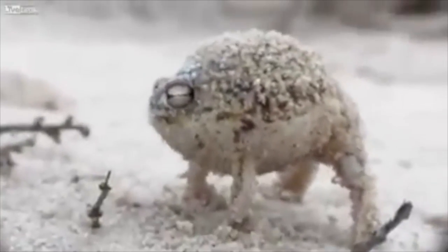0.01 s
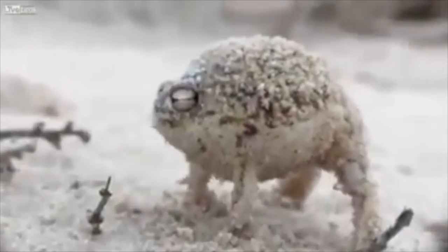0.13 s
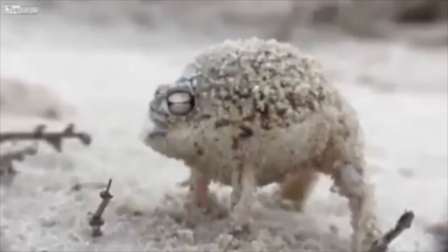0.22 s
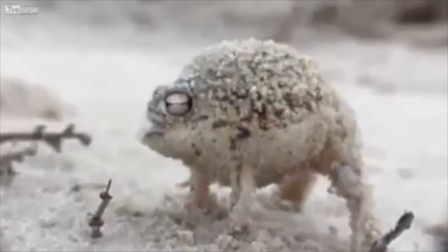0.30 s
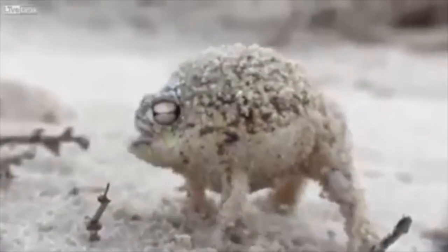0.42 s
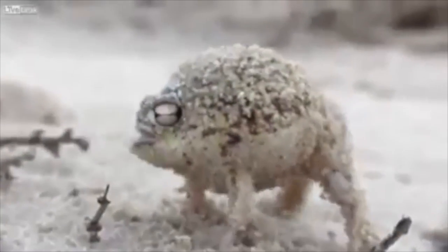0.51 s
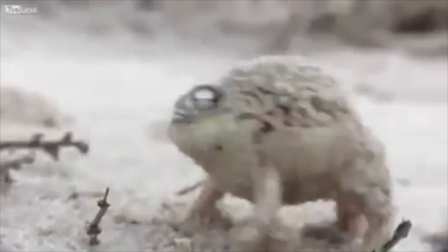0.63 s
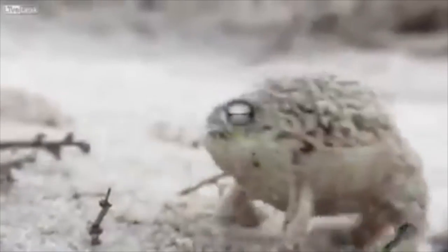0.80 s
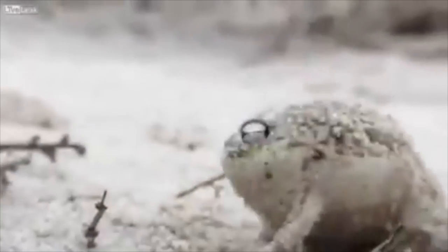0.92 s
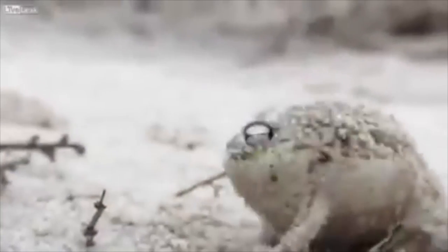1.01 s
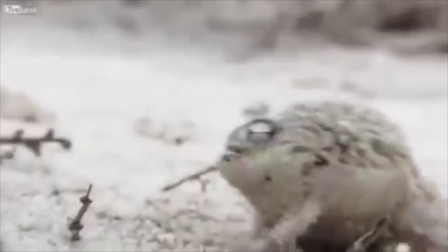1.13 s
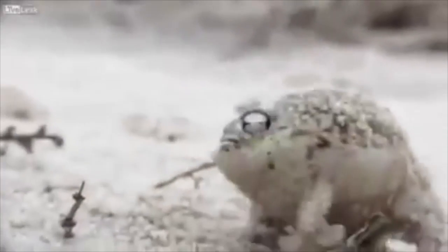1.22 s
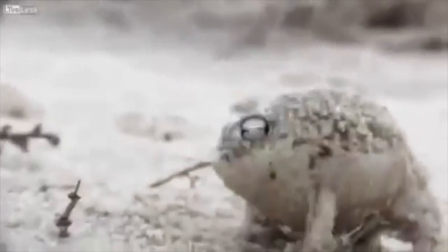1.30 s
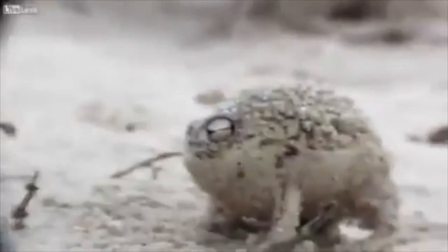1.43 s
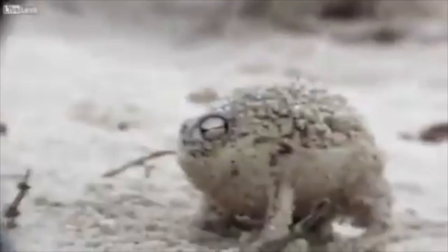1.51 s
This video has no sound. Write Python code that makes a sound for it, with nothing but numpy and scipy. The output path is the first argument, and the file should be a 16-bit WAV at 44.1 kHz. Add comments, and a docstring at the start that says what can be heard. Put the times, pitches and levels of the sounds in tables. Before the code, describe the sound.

Close, mono outdoor sound of a tiny frog crying shrilly twice, first long, then short with a husky end, after a faint low bump; light gusts rumble beneath and the open ground returns little echo.

```python
"""Open sand in light wind, a small desert rain frog close to the microphone, a faint hiss throughout.
First a dull thud with a soft knock in it, then a long shrill squeak, a short gap and a shorter squeak.
Each cry is a stack of harmonics gliding in pitch; a sharp resonance lifts one after another, then sinks
as the cry runs out into a rasp. Husky puffs of shaped noise mark where the voice breaks, sand and scrub
return a weak echo, and the wind is low noise rising and falling in gusts."""
import sys
import numpy as np
from scipy import signal
from scipy.fft import rfft, irfft
from scipy.io import wavfile

SR = 44100
rng = np.random.default_rng(int(sys.argv[2]) if len(sys.argv) > 2 else 0)


def wav_out(sig):
    """Save sig, one row per channel (or a flat mono array), as 16-bit PCM at SR to the path in sys.argv[1]."""
    wavfile.write(sys.argv[1], SR, np.round(np.clip(np.atleast_2d(sig).T, -1, 1) * 32767).astype(np.int16))


N = 68355
TIME = np.arange(N) / SR   # seconds

# Gusts on the microphone. Each row: time in seconds, level in dB.
WIND_GUSTS = [(0, -39.5), (.07, -34), (.12, -54), (.22, -43.5), (.3, -62), (.43, -43.5), (.52, -47),
              (.6, -45.5), (.68, -36), (.73, -48), (.78, -39), (.85, -49), (.96, -60), (1.07, -59),
              (1.14, -47.5), (1.22, -60.5), (1.55, -54.5)]
# Spectrum of the wind rumble. Each row: frequency in Hz, relative density in dB per Hz.
WIND_SPECTRUM = [(15, -8.5), (30, -0.5), (55, 3), (90, 1), (150, -5), (250, -21.5), (500, -42.5),
                 (1500, -73.5)]
# Spectrum of the faint outdoor hiss. Each row: frequency in Hz, relative density in dB per Hz.
AIR_SPECTRUM = [(30, -10), (130, -1.5), (270, -1), (450, -8), (800, -11.5), (1500, -20.5), (3000, -27.5),
                (6000, -30.5), (8200, -35.5), (9000, -48.5)]
# Spectrum of the dull thud. Each row: frequency in Hz, relative density in dB per Hz.
THUD_SPECTRUM = [(40, -3), (110, 3.5), (210, -2.5), (350, -13.5), (700, -22.5), (1100, -45), (3000, -62)]
# Places where the voice breaks into a husky rattle.
# Each row: time of the peak in seconds, level there in dB, rise and fall constants in seconds.
VOICE_BREAKS = [(0.212, -40, 0.0032, 0.0055), (0.798, -44, .008, 0.014), (1.057, -44, 0.0053, 0.0063),
                (1.25, -48, 0.017, .04), (1.318, -40, .016, 0.014)]
# Spectrum of the husky air. Each row: frequency in Hz, relative density in dB per Hz.
HUSK_SPECTRUM = [(600, -29.5), (1200, -5.5), (1800, 2), (2600, 1), (3500, -5), (4400, -17), (5800, -13.5),
                 (8000, -33)]
# Fixed colour of throat and body. Each row: frequency in Hz, level of a harmonic there in dB.
THROAT_COLOUR = [(550.0, -59.2), (1000.0, -51.3), (1400.0, -43.5), (2000.0, -39.0), (2400.0, -38.8),
                 (2750.0, -43.2), (3250.0, -37.2), (3750.0, -39.1), (4400.0, -50.3), (4700.0, -40.9),
                 (5050.0, -31.2), (5600.0, -28.6), (6200.0, -28.3), (6700.0, -36.4), (7300.0, -28.0),
                 (8000.0, -29.6), (8450.0, -34.0), (8900.0, -56.2)]
# Pitch of each cry. Each row: time in seconds, fundamental in Hz.
LONG_PITCH = [(0.207, 1520), (0.214, 1400), (0.218, 1174), (0.222, 1061), (0.231, 1044), (0.243, 1092),
              (0.26, 1178), (0.28, 1218), (0.3, 1239), (0.328, 1256), (0.355, 1233), (0.4, 1161),
              (0.47, 1060), (0.542, 924), (0.575, 918), (0.6, 902), (0.635, 866), (0.666, 814), (0.69, 817),
              (0.72, 817), (0.738, 784), (0.766, 680), (0.79, 646), (0.83, 640)]
SHORT_PITCH = [(1.037, 1270), (1.043, 1335), (1.05, 1270), (1.057, 930), (1.062, 904), (1.07, 906),
               (1.085, 955), (1.1, 991), (1.125, 1026), (1.15, 1040), (1.175, 1031), (1.2, 989),
               (1.222, 920), (1.242, 836), (1.26, 729), (1.272, 666), (1.284, 617), (1.296, 619),
               (1.301, 550), (1.307, 530), (1.313, 420), (1.324, 320), (1.36, 240)]
# Effort of each cry. Each row: time in seconds, level in dB, roughness from 0 to 1.
LONG_EFFORT = [(0.202, -23, 0.46), (0.21, 3.5, 0.32), (.224, 1.5, 0.18), (.27, 0.5, 0.16), (.35, -1.5, 0),
               (0.452, -0.5, 0.13), (0.539, 0.5, 0.07), (0.619, 0.5, 0.1), (0.679, 1, 0.05), (.74, 1, 0.17),
               (.778, -3.5, .15), (.797, -12.5, 0.54), (.82, -28, 0.4)]
SHORT_EFFORT = [(1.034, -27.5, .5), (1.041, 4, .25), (1.056, 2, 0.34), (1.08, 2.5, 0.2), (1.13, 3.5, 0.071),
                (1.19, 1.5, 0.15), (1.22, 0, 0.27), (1.26, -1.5, 0.29), (1.295, -2, .2), (1.307, -5, .25),
                (1.321, -6.5, 0.39), (1.336, -15, .6), (1.368, -29, .7)]
# Moving shrill resonance of each cry. Each row: time in seconds, centre in Hz, lift in dB.
LONG_SHRILL = [(.209, 5950, -0.5), (.217, 6500, .5), (.226, 7070, 14), (.239, 7220, 15), (.25, 7520, 4.5),
               (.268, 7470, 17), (.301, 7470, 14.5), (.361, 7610, 16), (.401, 7390, 16), (.44, 7100, 7),
               (.457, 7300, 8), (.517, 6570, 10.5), (.534, 6330, 4.5), (.561, 6470, 12), (.616, 6430, 12.5),
               (.653, 5550, 8), (.666, 5200, 5), (.68, 4810, 13), (.69, 4150, 5), (.704, 3564, 8),
               (.742, 3250, 3), (.801, 2150, 1.5)]
SHORT_SHRILL = [(1.04, 3730, 8), (1.047, 4050, 14.4), (1.054, 4300, 8.2), (1.06, 5450, 7.2),
                (1.07, 6320, 7.6), (1.078, 7200, 4.3), (1.102, 7420, 11), (1.115, 7410, 12),
                (1.132, 7080, 12.7), (1.15, 7020, 11), (1.172, 6850, 9.4), (1.2, 6380, 5.2),
                (1.216, 6260, 5.9), (1.236, 6000, 13.5), (1.253, 5830, 6.7), (1.271, 5140, 13),
                (1.289, 4600, 14.2), (1.297, 3970, 4.3), (1.305, 3260, 14.4), (1.313, 2878, 3.9),
                (1.323, 2620, 9), (1.355, 1703, 2.8)]

AIR_DB = -55
THUD_S, THUD_DB, THUD_RISE_S, THUD_FALL_S = 0.0451, -28, 0.0077, 0.0057
# The knock's starting level is the one before its lowpass; t60 is the time to fall 60 dB.
KNOCK_S, KNOCK_DB, KNOCK_HZ, KNOCK_T60_S = 0.042, -28.5, 462, 0.0048
RATTLE_HZ, RATTLE_DEPTH_DB = 250, 4   # fastest flaps, and spread of their level
SHRILL_WIDTH_HZ = 506
# Harmonics above this multiple of the resonance centre fade.
ROLLOFF_START, ROLLOFF_DB_PER_OCTAVE, ROLLOFF_MAX_DB = 1.0295, 31, 29
# Pitch unsteadiness, a share of the pitch at full roughness; it grows with roughness squared.
JITTER, JITTER_HZ = 0.03, 155
# Scatter of each harmonic at full roughness, and the bandwidth that it smears over.
RASP, RASP_HZ = 0.99, 323
# Scatter is stronger in the treble and hardly lifted by the resonance.
RASP_DB_PER_OCTAVE, RASP_PIVOT_HZ, RASP_LIFT_SHARE = 3.5, 5000, 0.08
# Harmonics flutter in level, less so where the resonance lifts them.
FLUTTER_DB, FLUTTER_HZ, STEADYING_DB = 1.5, 79.2, 5.5
ECHO_DB, ECHO_T60_S, ECHO_DELAY_S = -26, 0.14, 0.005
CUTOFF_HZ = 8800


def from_db(db):
    """Turn decibels into amplitude gain."""
    return 10 ** (np.asarray(db) / 20)


def rms_one(x):
    """Scale to unit power."""
    return x / np.sqrt(np.mean(x ** 2) + 1e-20)


def in_time(rows):
    """Read each column of a timed table at every sample."""
    s, *columns = np.transpose(rows)
    return [np.interp(TIME, s, column) for column in columns]


def at_hz(points, hz):
    """Read a spectrum on a log-frequency axis."""
    f, db = np.transpose(points)
    return np.interp(np.log(np.maximum(hz, 1)), np.log(f), db)


def drift(hz):
    """Random wander up to the given rate, with steep skirts; rms 1."""
    lowpass = signal.butter(2, hz, fs=SR, output="sos")
    once = signal.sosfilt(lowpass, rng.standard_normal(N))
    return rms_one(signal.sosfilt(lowpass, once))


def noise(colour):
    """Noise of a given spectrum; rms 1."""
    gain = from_db(at_hz(colour, np.fft.rfftfreq(N, 1 / SR)))
    return rms_one(irfft(rfft(rng.standard_normal(N)) * gain, N))


def air_hiss():
    """Faint outdoor hiss: steady noise, weaker towards the treble."""
    return from_db(AIR_DB) * noise(AIR_SPECTRUM)


def wind():
    """Wind on the microphone: low rumbling noise that swells and drops in gusts."""
    gust_db, = in_time(WIND_GUSTS)
    return from_db(gust_db) * noise(WIND_SPECTRUM)


def thud():
    """One dull thud: low noise that swells and dies within a few hundredths of a second."""
    age = TIME - THUD_S
    envelope = np.exp(-np.maximum(-age / THUD_RISE_S, age / THUD_FALL_S))
    return from_db(THUD_DB) * envelope * noise(THUD_SPECTRUM)


def knock():
    """A soft knock inside the thud: a briefly ringing, decaying sine with its onset smoothed."""
    since = np.maximum(TIME - KNOCK_S, 0)
    level_db = KNOCK_DB - np.minimum(60 * since / KNOCK_T60_S, 200)
    ring = from_db(level_db) * np.sin(2 * np.pi * KNOCK_HZ * since)
    return signal.sosfilt(signal.butter(2, 2 * KNOCK_HZ, fs=SR, output="sos"), ring)


def ground_echo(x):
    """A weak, quickly dying scatter from the sand and scrub: decaying noise convolved with the call."""
    decay = from_db(-60 * TIME / ECHO_T60_S) * (TIME > ECHO_DELAY_S)
    tail = rng.standard_normal(N) * decay
    return from_db(ECHO_DB) * signal.fftconvolve(x, tail / np.linalg.norm(tail))[:N]


def husk():
    """Turbulent air chopped by uneven flaps, where a cry catches or runs out."""
    swell = np.zeros(N)
    for s, peak_db, rise, fall in VOICE_BREAKS:
        swell += from_db(peak_db) * np.exp(-np.maximum((s - TIME) / rise, (TIME - s) / fall))
    air = noise(HUSK_SPECTRUM)
    flaps = from_db(RATTLE_DEPTH_DB * drift(RATTLE_HZ))
    return swell * rms_one(air * flaps)


def cry(pitch, effort, shrill, count=16):
    """Harmonics of the vocal pulses, coloured by throat and moving resonance, scattered by roughness."""
    f0, = in_time(pitch)
    level_db, rough = in_time(effort)
    centre, lift_db = in_time(shrill)
    unsteady_f0 = f0 * (1 + JITTER * rough ** 2 * drift(JITTER_HZ))
    phase = 2 * np.pi * np.cumsum(unsteady_f0) / SR
    out = np.zeros(N)
    for k in range(1, count + 1):
        hz = k * f0
        detune = (hz - centre) / SHRILL_WIDTH_HZ
        octaves_above = np.log2(hz / (ROLLOFF_START * centre))
        rolloff_db = np.clip(ROLLOFF_DB_PER_OCTAVE * octaves_above, 0, ROLLOFF_MAX_DB)
        ring_db = lift_db * np.exp(-0.5 * detune ** 2)
        flutter_db = FLUTTER_DB * drift(FLUTTER_HZ) * np.exp(-ring_db / STEADYING_DB)
        angle = k * phase - np.arctan(detune)   # phase turns as the resonance passes
        tone = from_db(ring_db + flutter_db) * np.cos(angle)
        # Two independent wanders smear the harmonic into a narrow band of noise.
        scatter = drift(RASP_HZ) * np.cos(angle) + drift(RASP_HZ) * np.sin(angle)
        treble_db = RASP_DB_PER_OCTAVE * np.log2(hz / RASP_PIVOT_HZ)
        rasp = RASP * rough * from_db(RASP_LIFT_SHARE * ring_db + treble_db) * scatter
        colour = from_db(at_hz(THROAT_COLOUR, hz) - rolloff_db)
        out += colour * (tone + rasp) * (hz < SR / 4)
    sounding = (TIME > effort[0][0]) & (TIME < effort[-1][0])
    return out * from_db(level_db) * sounding


def scene():
    """The frog close by on open sand, with wind, thud and faint hiss around it."""
    outdoors = wind() + thud() + knock() + air_hiss()
    long_cry = cry(LONG_PITCH, LONG_EFFORT, LONG_SHRILL)
    short_cry = cry(SHORT_PITCH, SHORT_EFFORT, SHORT_SHRILL)
    frog = long_cry + short_cry + husk()
    return (frog + ground_echo(frog) + outdoors)[None]


def record(dry):
    """One channel, its top cut steeply by an elliptic lowpass."""
    steep = signal.ellip(10, 0.1, 70, CUTOFF_HZ, fs=SR, output="sos")   # ripple, stopband in dB
    return signal.sosfilt(steep, dry)


dry = scene()
out = record(dry)
wav_out(out)
```